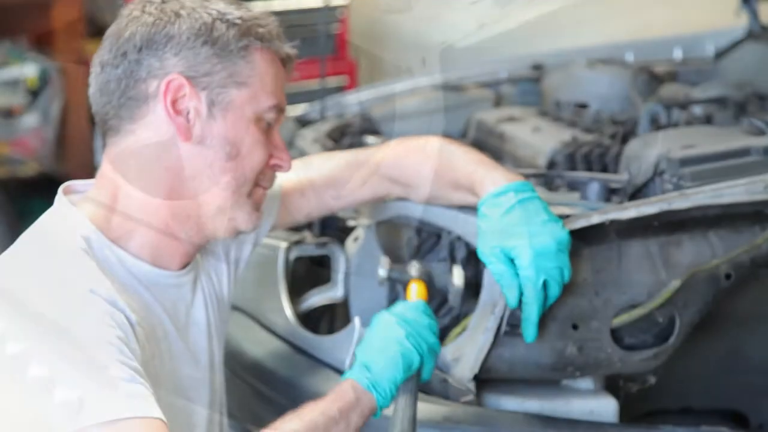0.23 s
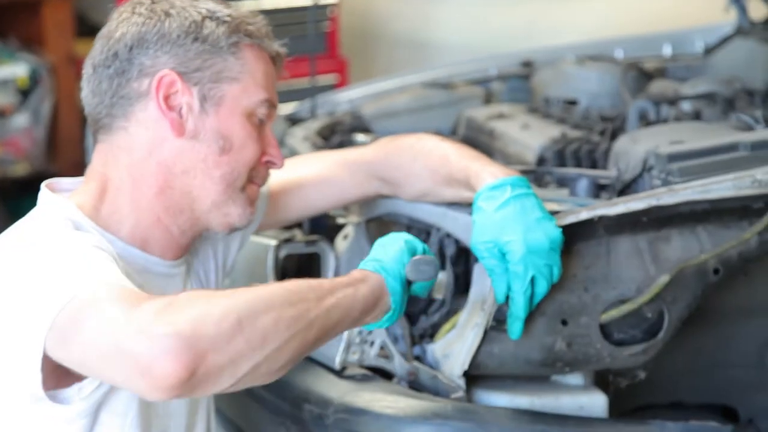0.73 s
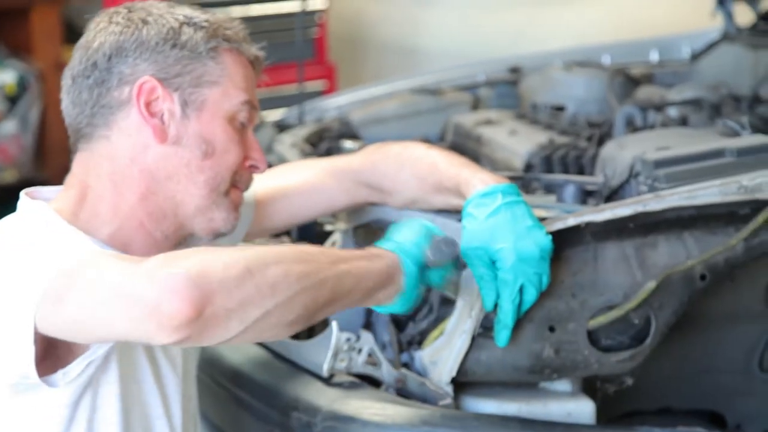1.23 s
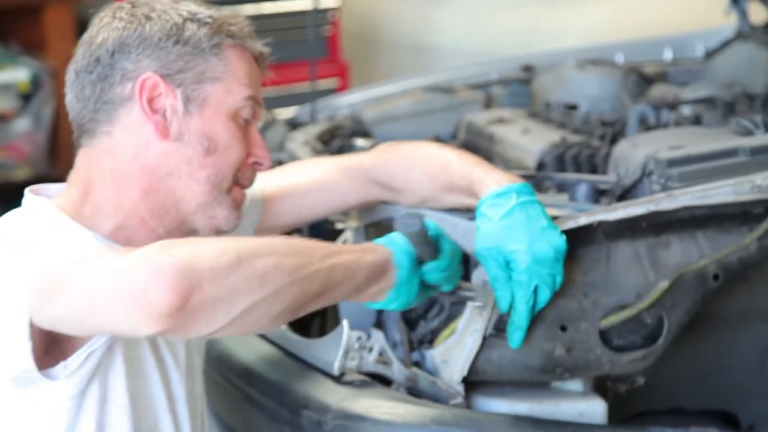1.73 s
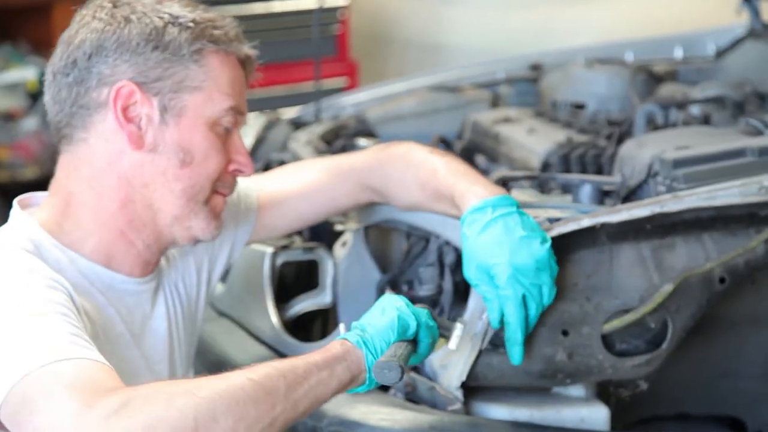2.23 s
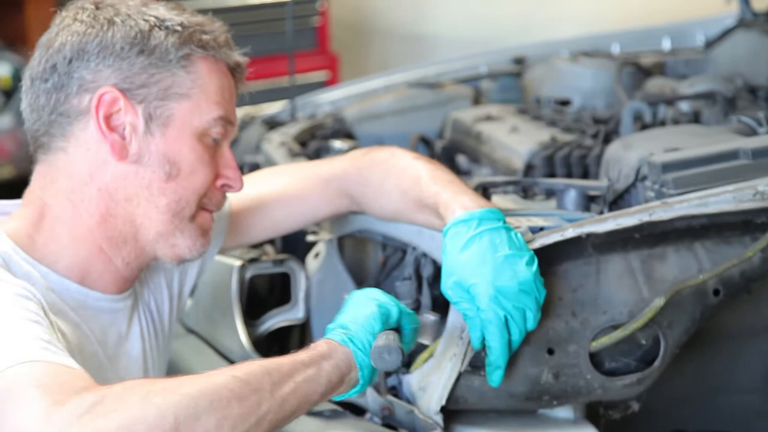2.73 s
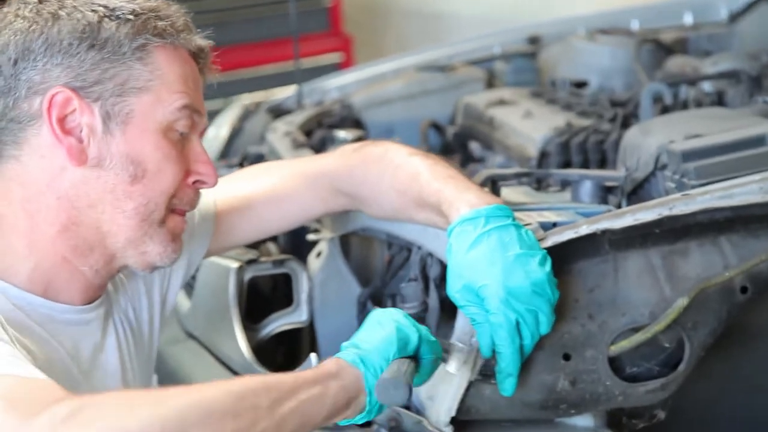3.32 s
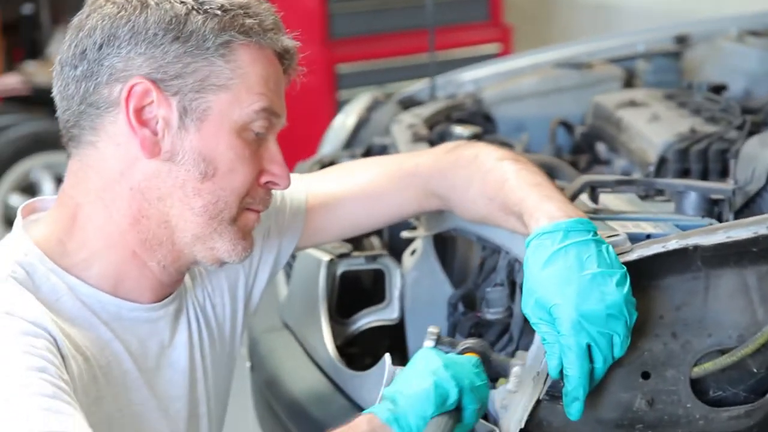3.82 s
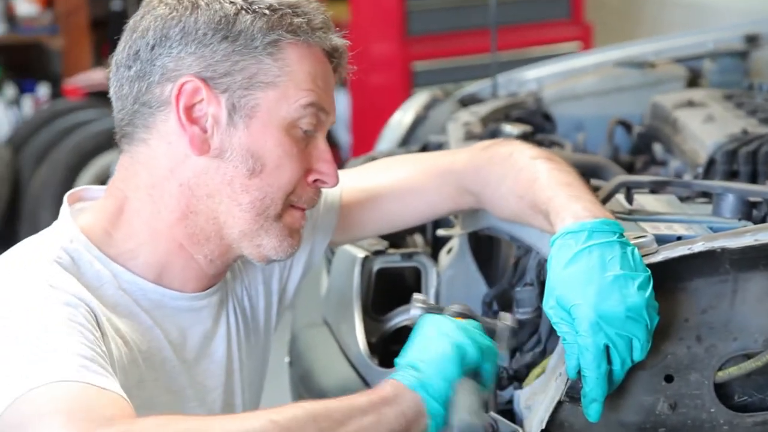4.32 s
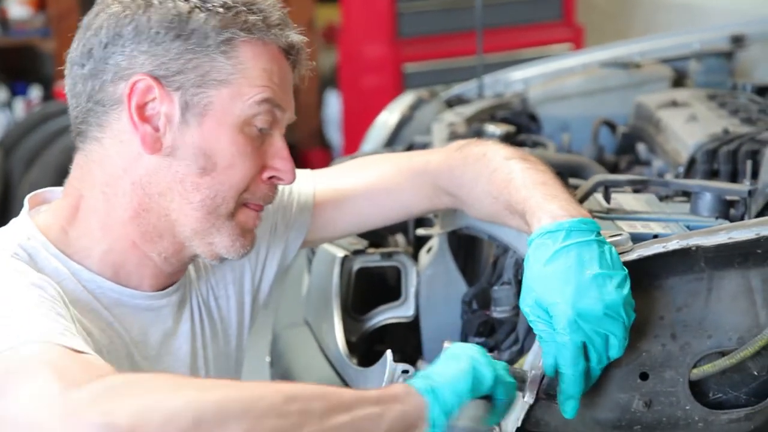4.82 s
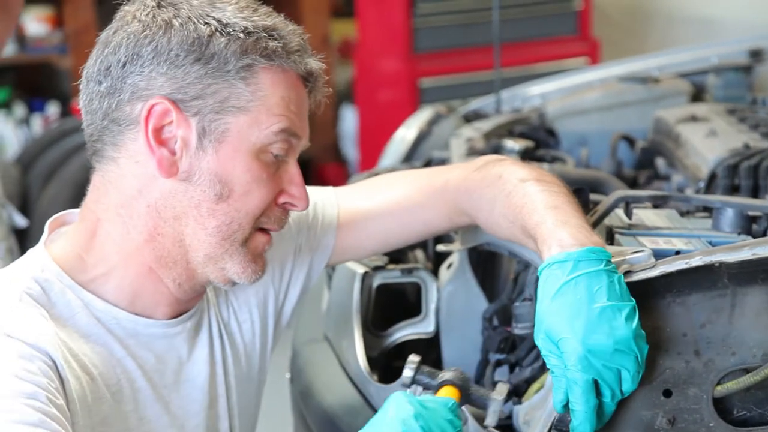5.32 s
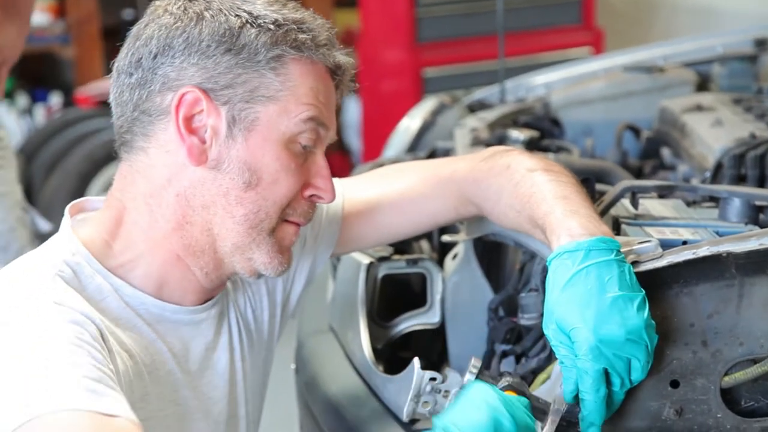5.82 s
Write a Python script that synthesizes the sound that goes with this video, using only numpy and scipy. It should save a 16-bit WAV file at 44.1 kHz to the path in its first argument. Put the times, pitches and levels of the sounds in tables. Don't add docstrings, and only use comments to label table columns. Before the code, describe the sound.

Quiet workshop hum and the dying echo of earlier work give way to runs of hammering on a bent car panel: six blows, then four, four and two, about a quarter second apart. Pitch and brightness change with every landing spot, some dull and boomy, some piercing as the hammer head rings. Light knocks and far-off ticking fill the gaps. Stereo pickup a metre or two away, reverberant, with gritty overloaded peaks.

```python
import sys
import numpy as np
from scipy import signal
from scipy.io import wavfile

SR = 44100
rng = np.random.default_rng(int(sys.argv[2]) if len(sys.argv) > 2 else 0)


def waveform_to_disk(signal):
    frames = np.transpose(np.atleast_2d(signal))
    scaled = np.clip(frames, -1, 1) * 32767
    samples = np.round(scaled).astype(np.int16)
    wavfile.write(sys.argv[1], SR, samples)


def voltage_ratio(decibels):
    exponent = np.asarray(decibels, float) / 20
    return 10 ** exponent


N = 268128


def along(table, hz, col):
    table = np.array(table)
    return np.interp(np.log(hz), np.log(table[:, 0]), table[:, col])


def fall(t, t60):
    return np.exp(-np.log(1000) * t / t60)


def ring(hz, t60, t):
    return fall(t, np.maximum(t60, 0.005)[:, None]) * np.sin(2 * np.pi * hz[:, None] * t)


def swell(hz, cycles, t):
    return 1 - np.exp(-t * hz[:, None] / cycles)


def add(track, s, sound):
    i = max(int(s * SR), 0)
    track[i:i + len(sound)] += sound[:N - i]


def band(lo_hz, hi_hz, size, shape=1):
    hi_hz = min(hi_hz, 0.45 * SR)
    sos = signal.butter(2, [lo_hz, hi_hz], "bandpass", fs=SR, output="sos")
    noise = shape * rng.standard_normal((2, size))
    return signal.sosfilt(sos, noise) * np.sqrt(SR / 2 / (hi_hz - lo_hz))


def stereo(pair, side):
    return np.array([pair[0] + side * pair[1], pair[0] - side * pair[1]])


# start in seconds, strength in dB, boom in dB, clang in dB, crack in dB.
BLOWS = [(0.549, 1, -12.5, -13.5, -16.5), (0.821, 0, -13, -12.5, -12.5), (1.059, -0.5, -14.5, -18, -23),
         (1.273, -1, -12, -12.5, -6.5), (1.475, 3, -21, -13.5, -17), (1.65, -3, -15, -11.5, -6),
         (2.588, -2.5, -12, -16, -17), (2.854, 3.5, -17, -10.5, -12), (3.067, 5, -20.5, -13.5, -14.5),
         (3.249, 3, -13, -9.5, -11), (4.143, -1, -13, -13, -11), (4.386, 3.5, -12.5, -8, -7),
         (4.603, 2, -15.5, -9.5, -8.5), (4.808, 6, -18, -7.5, -11), (5.795, -2.5, -9.5, -18, -11.5),
         (6.046, 1.5, -15, -7.5, -5.5)]


def colour_db(blow, hz):
    _, strength, boom, clang, crack = blow
    tilt = [(350, boom + 8), (900, 0.017), (3000, clang + 5), (8000, crack + 11)]
    return strength + along(tilt, hz, 1)


# pitch in Hz, level in dB, time to die away by 60 dB in seconds.
PANEL = [(99, -22, 0.4), (126, -18, 0.4), (164, -23, 0.9), (229, -12.5, .35), (328, -6, 0.095),
         (390, -3, 0.11), (462, -2, 0.065), (500, -9, 0.19), (577, -4, 0.17), (748, -12, 0.17),
         (790, -1, 0.089), (864, -8, 0.15), (1029, -8, 0.15), (1520, -29, 0.04)]


def panel():
    t = np.arange(SR // 2) / SR
    hz, db, t60 = np.transpose(PANEL)
    modes = ring(hz, t60, t) * swell(hz, 4.0, t)
    spot = rng.standard_normal((len(BLOWS), 2, len(hz)))
    out = np.zeros(N)
    for blow, (sign, share) in zip(BLOWS, spot):
        gain = np.sign(sign) * voltage_ratio(db + 3.3 * share + colour_db(blow, hz))
        add(out, blow[0], gain @ modes)
    return out


# frequency in Hz, level in dB per third octave,
# time to die away by 60 dB in seconds, echo level in dB.
SHEET = [(49.5, -45.5, 0.1, -10), (152, -33.5, 0.75, -9), (285, -18.5, 0.25, -5.5), (556, -16, 0.42, -5.5),
         (1290, -13, 0.25, -10), (2400, -5, 0.13, -11.5), (4000, -6, .1, -13.5), (5530, -15.5, 0.1, -8.5),
         (7580, -11, 0.097, -12), (9600, -28.5, 0.058, -12.5), (15000, -31.5, 0.04, -3)]
WALL_S, WALL_SMEAR_S, WALL_BOOST = 0.026, 0.007, 1.2
SHEET_SIDE, SHEET_ECHO_SIDE = 0.23, 0.5
ECHO_RISE_S = 0.0056


def sheet():
    t, out = np.arange(SR) / SR, 0
    near_t = t[:SR // 2]
    bloom = 1 + WALL_BOOST * np.exp(-((near_t - WALL_S) / WALL_SMEAR_S) ** 2)
    for hz in 40 * 2 ** (np.arange(27) / 3):
        near, far = np.zeros(N), np.zeros(N)
        clatter = bloom * fall(near_t, along(SHEET, hz, 2)) ** 2
        echo = voltage_ratio(along(SHEET, hz, 3)) ** 2 * fall(t, along(GARAGE, hz, 1)) ** 2
        echo = echo * (1 - np.exp(-t / ECHO_RISE_S))
        for blow in BLOWS:
            power = voltage_ratio(along(SHEET, hz, 1) + colour_db(blow, hz)) ** 2
            add(near, blow[0], power * clatter)
            add(far, blow[0], power * echo)
        spread = (hz / 1000) ** 0.14
        side_power = (SHEET_SIDE ** 2 * near + SHEET_ECHO_SIDE ** 2 * far) * spread ** 2
        shape = np.sqrt([near + far, side_power])
        out = out + stereo(band(hz / 2 ** (1 / 6), hz * 2 ** (1 / 6), N, shape), 0.9)
    return out


def clear_modes(rows):
    out, t = np.zeros(N), np.arange(SR // 2) / SR
    s, hz, db, t60 = np.transpose(rows)
    modes = ring(hz, t60, t) * swell(hz, 8.0, t) ** 3
    for at, gain, mode in zip(s, voltage_ratio(db), modes):
        add(out, at, gain * mode)
    return out


# lower clank in Hz, upper clank in Hz,
# upper over lower clank in dB, lower clang in Hz, upper clang in Hz.
SPOTS = [(395, 845, 1, 1710, 3080), (390, 1020, -2.5, 1880, 2400), (392, 770, -6, 1432, 2350),
         (390, 747, -11.5, 1860, 3890), (386, 1034, 1, 1923, 2440), (390, 877, -5, 1300, 3040),
         (420, 600, 1, 1343, 4160), (526, 762, 20.5, 1980, 2314), (420, 1087, 13, 1320, 2910),
         (235, 760, 8, 2145, 2953), (388, 757, 6, 2100, 2750), (538, 1052, 25, 2180, 2860),
         (396, 770, 1, 1960, 3640), (553, 833, 25, 1606, 2566), (574, 1030, 2, 1690, 2344),
         (586, 770, 6, 2200, 3560)]
CLANK_DB, LOWER_DB = -1, 15
LOWER_T60_S, UPPER_T60_S = 0.085, 0.12
CLANK_FOLLOW = 0.4


def clanks():
    rows = []
    for (s, strength, *_), (low_hz, high_hz, lean, *_) in zip(BLOWS, SPOTS):
        db = CLANK_FOLLOW * strength + CLANK_DB
        rows.append((s, low_hz, db + LOWER_DB - max(lean, 0), LOWER_T60_S))
        rows.append((s, high_hz, db + min(lean, 0), UPPER_T60_S))
    return clear_modes(rows)


# start in seconds, pitch in Hz, width in
# Hz, level in dB, time to die away by 60 dB in seconds.
HEAD = [(1.273, 4020, 260, -20, .5), (1.651, 7150, 560, -12.5, 0.4), (1.65, 7120, 300, -22, 0.6),
        (1.657, 5864, 260, -21, 0.52), (3.065, 5930, 320, -20, .6), (3.067, 7150, 600, -20, .5),
        (.549, 845, 60, -17, .6), (4.144, 2750, 400, -24, .55), (3.248, 5890, 200, -23.5, 0.54),
        (4.808, 3920, 200, -16, 0.47), (0.0, 880, 110, -42.5, 0.79), (0.0, 443, 120, -46, 0.6),
        (5.495, 650, 750, -44, .5), (1.651, 6900, 2400, -21, .45)]
CLANG_DB, CLANG_T60_S, CLANG_WIDTH = -15, 0.3, 0.07


def clangs():
    out, t = np.zeros((2, N)), np.arange(SR) / SR
    clusters = list(HEAD)
    for blow, spot in zip(BLOWS, SPOTS):
        for hz in spot[3:]:
            db = colour_db(blow, hz) + CLANG_DB
            clusters.append((blow[0], hz, CLANG_WIDTH * hz, db, CLANG_T60_S))
    for s, hz, width, db, t60 in clusters:
        shape = voltage_ratio(db - 60 * t / t60) * (1 + 0.86 * np.exp(-t / 0.0061))
        pair = stereo(band(hz - width / 2, hz + width / 2, SR, shape), 0.38)
        for side, sound in zip(out, pair):
            add(side, s, sound)
    return out


# start in seconds, pitch in Hz, level in dB, time to die away by 60 dB in seconds.
KNOCKS = [
    (3.9, 225, -15, 0.1),
    (5.48, 320, -12, 0.05),
    (2.098, 1500, -26.5, 0.01),
]


def knocks():
    return clear_modes(KNOCKS)


# frequency in Hz, time to die away by 60 dB in seconds, level in dB.
GARAGE = [(80, 0.99, 2.5), (200, 0.55, 3), (500, 0.88, -2.5), (1160, 0.98, -22), (3240, 0.8, -5),
          (6730, 0.56, -12.5), (13800, 0.21, -22)]
ECHO_DB, ECHO_SIDE = -5, 0.39


def garage():
    t, echo = np.arange(SR) / SR, 0
    for hz in 40 * 2 ** np.arange(0, 8.8, 0.5):
        t60 = along(GARAGE, hz, 1)
        fade = fall(t, t60) * (1 - np.exp(-t / ECHO_RISE_S))
        weight = voltage_ratio(along(GARAGE, hz, 2)) * np.sqrt(hz / t60 / SR ** 2 * 10)
        side = ECHO_SIDE * (hz / 1000) ** 0.17
        echo = echo + weight * fade * stereo(band(hz / 2 ** 0.19, hz * 2 ** 0.18, SR), side)
    echo = echo * voltage_ratio(ECHO_DB)
    echo[:, 0] = voltage_ratio(np.array([0.2, -0.2]))
    return echo


# frequency in Hz, level in dB per Hz.
WORKSHOP = [(18, -42), (30, -21.5), (133, 1), (432, -3), (479, -1.5), (561, -0.5), (1400, -4.5),
            (3400, -10), (3680, -8.5), (8500, -11), (9430, -23), (15500, -20.5)]
WORKSHOP_DB, FLICKER_DB = -49, 1.3


def workshop():
    out = 0
    for hz in 30 * 2 ** np.arange(0, 9.2, 0.5):
        flicker = np.interp(np.arange(N), np.linspace(0, N, 60), rng.standard_normal(60))
        gain = voltage_ratio(along(WORKSHOP, hz, 1) + FLICKER_DB * flicker) * np.sqrt(hz)
        out = out + gain * stereo(band(hz / 2 ** 0.28, hz * 2 ** 0.14, N), 0.53)
    return out * voltage_ratio(WORKSHOP_DB) / out.std()


# start in seconds, level in dB.
TICKS = [
    (.2, -62),
    (.39, -65),
    (1.99, -56),
    (2.14, -56),
    (2.291, -58),
    (2.37, -67),
    (2.49, -65),
]


def ticking():
    shape = np.zeros(N)
    for s, db in TICKS:
        add(shape, s, voltage_ratio(db) * np.exp(-np.arange(4000) / SR / 0.037))
    hiss = band(8100, 9000, N) + 0.7 * band(10200, 11300, N) + 0.7 * band(6000, 13000, N)
    return shape * stereo(hiss, 0.78)


def earlier_work():
    fade = voltage_ratio(-45 - 60 * np.arange(N) / SR / 0.75)
    return fade * stereo(band(300, 1600, N), 0.5)


CLANK_WET = 0.35
LEAN_DB = 0.27


def scene():
    clear = clanks() + knocks()
    to_walls = voltage_ratio(-7.5) * panel() + CLANK_WET * clear
    modes = signal.fftconvolve(to_walls[None], garage(), axes=1)[:, :N] + (1 - CLANK_WET) * clear
    background = workshop() + ticking() + earlier_work()
    mix = modes + voltage_ratio(-4.5) * sheet() + clangs() + background
    return mix * voltage_ratio(np.array([[LEAN_DB], [-LEAN_DB]]))


def roll_off(x):
    return signal.sosfilt(signal.butter(12, 15770, fs=SR, output="sos"), x)


def record(dry):
    drive_db = 3.5
    mix = np.clip(voltage_ratio(drive_db) * dry, -1.0, 1.0)
    return roll_off(mix)


dry = scene()
out = record(dry)
waveform_to_disk(out)
```